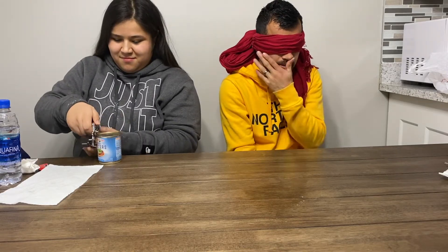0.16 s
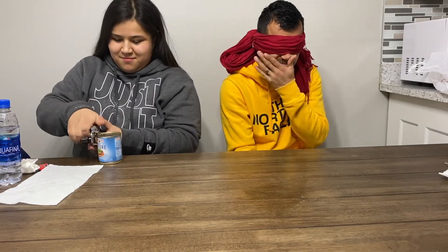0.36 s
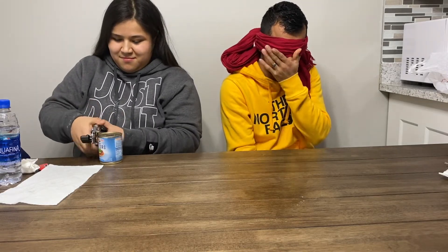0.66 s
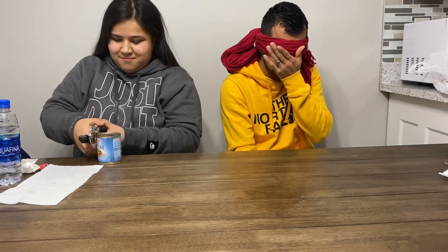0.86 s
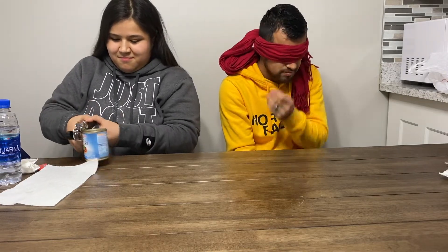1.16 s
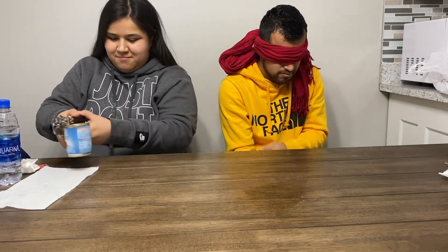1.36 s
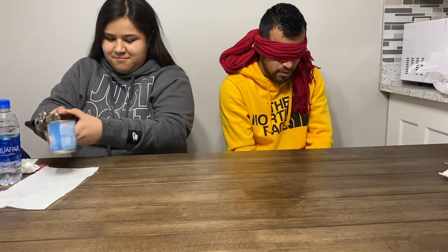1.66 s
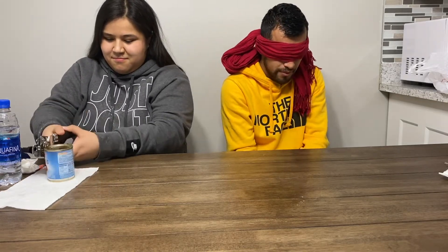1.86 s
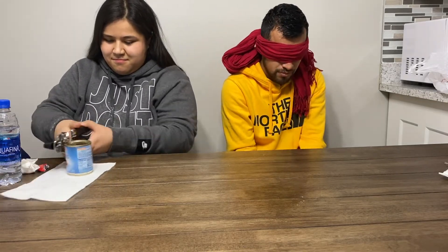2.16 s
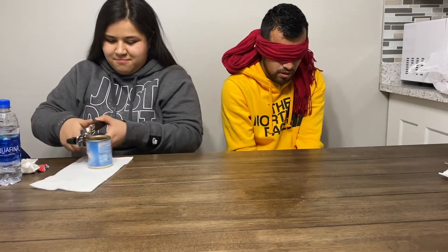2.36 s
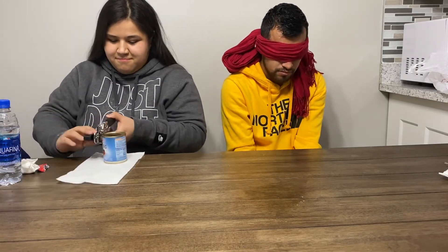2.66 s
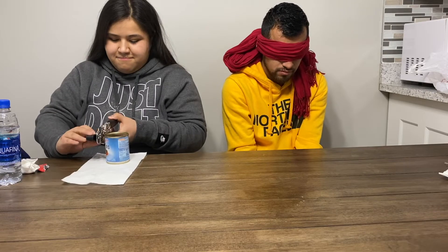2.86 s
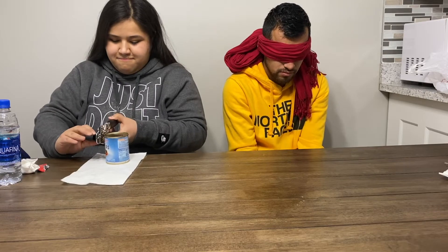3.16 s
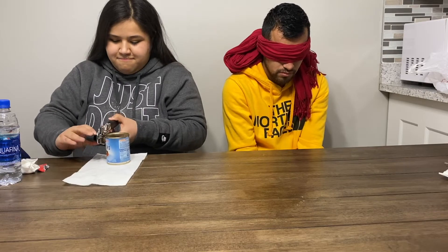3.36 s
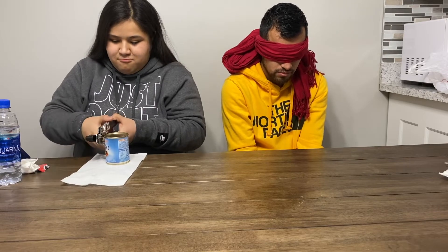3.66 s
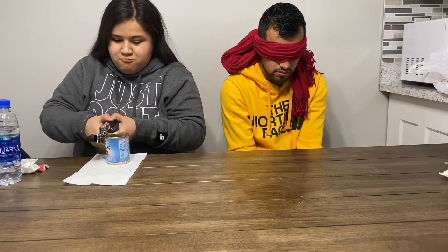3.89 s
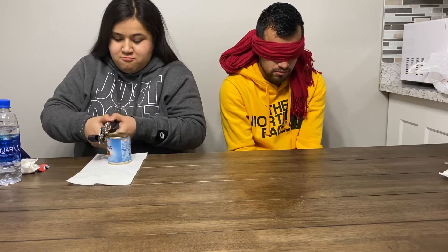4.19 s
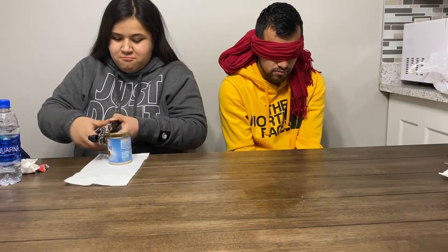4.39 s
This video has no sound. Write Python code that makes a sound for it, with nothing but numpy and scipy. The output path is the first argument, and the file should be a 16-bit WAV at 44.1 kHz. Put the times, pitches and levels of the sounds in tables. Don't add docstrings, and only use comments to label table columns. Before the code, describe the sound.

In a small kitchen with a humming fridge, a tin thuds on a wooden table, napkin rustles, opener ticks, then one sharp metallic snap rings.

```python
import sys
import numpy as np
from scipy import signal
from scipy.fft import rfft, irfft, next_fast_len
from scipy.io import wavfile

SR = 44100
rng = np.random.default_rng(int(sys.argv[2]) if len(sys.argv) > 2 else 0)


def generate_wav(sig):
    pcm = np.round(np.clip(np.atleast_2d(sig).T, -1, 1) * 32767).astype(np.int16)
    wavfile.write(sys.argv[1], SR, pcm)


def field_ratio(decibels):
    return 10 ** (np.asarray(decibels, dtype=float) / 20)


N = 199847


def rms_one(x):
    return x / np.sqrt(np.mean(x ** 2) + 1e-20)


def at_hz(points, hz):
    table_hz, value = np.transpose(points)
    return np.interp(np.log(np.maximum(hz, 1)), np.log(table_hz), value)


def coloured(x, spectrum):
    size = next_fast_len(x.shape[-1])
    gain = field_ratio(at_hz(spectrum, np.fft.rfftfreq(size, 1 / SR)))
    return rms_one(irfft(rfft(x, size) * gain, size)[..., :x.shape[-1]])


# (frequency [Hz], left-right likeness [0 to 1])
LIKENESS = [(60, 0.87), (130, 0.98), (290, 0.5), (640, 0.024), (1500, 0.013), (3000, 0.062), (6000, 0.12)]


def wide_noise(size):
    padded = next_fast_len(size)
    mid, side = rfft(rng.standard_normal((2, padded)))
    alike = np.clip(at_hz(LIKENESS, np.fft.rfftfreq(padded, 1 / SR)), 0, 1)
    stereo = np.sqrt(1 + alike) * mid + np.sqrt(1 - alike) * side * [[1], [-1]]
    return irfft(stereo, padded)[:, :size]


def drift(rate_hz):
    r = np.exp(-2 * np.pi * rate_hz / SR)
    return rms_one(signal.lfilter([1], [1, -2 * r, r * r], rng.standard_normal(N + SR))[SR:])


def resonate(x, hz, r):
    return signal.lfilter([1, 0, -1], [1, -2 * r * np.cos(2 * np.pi * hz / SR), r * r], x)


def ring(hz, t60, size=SR // 2):
    t = np.arange(size) / SR
    return np.sin(2 * np.pi * hz * t) * field_ratio(-60 * t / t60)


def ring_modes(modes):
    signs = rng.choice([-1, 1], len(modes))
    return sum(sign * field_ratio(db) * ring(hz, t60) for (hz, db, t60), sign in zip(modes, signs))


def add(out, s, sound):
    i = int(round(s * SR))
    out[i:i + len(sound)] += sound[:N - i]


# (frequency [Hz], width [Hz], level [dB])
HUM = [(115.5, 4, -55.5), (248, 1.8, -69.5), (357.5, 1.1, -64)]
# (frequency [Hz], level [dB per Hz])
AIR = [(15, -56), (30, -7.5), (60, -3.5), (120, -4.5), (195, -13.5), (354, -13.5), (476, -18.5),
       (1020, -27.5), (1600, -38), (2400, -40), (3100, -44), (3400, -51), (9570, -57.5), (16000, -78)]
AIR_DB = -54


def fridge():
    out = field_ratio(AIR_DB - 3) * coloured(wide_noise(N), AIR) * field_ratio(drift(0.33))
    for hz, width_hz, db in HUM:
        r = np.exp(-np.pi * width_hz / SR)
        waver = rms_one(resonate(rng.standard_normal(N + SR), hz, r)[SR:])
        steady = np.sin(2 * np.pi * hz / SR * np.arange(N) + 6 * rng.random())
        out = out + field_ratio(db) * (0.18 * waver + steady)
    return out


# (time [s], crack level [dB], thud level [dB], table ring level [dB], contact cut-off [Hz])
KNOCKS = [(.002, -47.5, -32.5, -37.5, 2210), (.043, -40, -28.5, -38.5, 3900),
          (0.048, -55, -43.5, -36, 3440), (0.316, -62, -38, -45.5, 2580), (0.452, -75, -35.5, -42, 2240),
          (0.461, -86, -38.5, -39, 1140), (1.875, -55, -18, -21.5, 1900), (1.879, -64, -13.5, -15.5, 1200),
          (1.888, -80, -35, -27.5, 850), (1.909, -53, -56.5, -24.5, 690),
          (3.531, -39.5, -44.5, -48.5, 1213), (3.544, -62, -38, -44, 600), (4.0891, -8.5, -12, -27, 4020),
          (4.096, -36, -30, -23, 1210)]
# (frequency [Hz], level [dB], t60 [s])
TABLE = [(55.9, -10.5, 0.87), (76.6, -18, 0.48), (102.1, -6.5, 0.23), (129, 1.5, 0.14), (178.5, 1, 0.19),
         (303.7, 2, 0.15), (383, -4, 0.034), (508, 1.5, 0.022), (668, -5, 0.091), (874.2, 1, 0.11),
         (1038, -6.5, 0.17)]
# (frequency [Hz], level [dB per Hz])
THUD = [(60, -38), (150, 8), (265, -4), (380, 1), (900, -3.5), (2000, -13), (4000, -21), (8000, -14)]
# (frequency [Hz], level [dB per Hz])
CRACK = [(500, -25.5), (1700, -22.5), (4000, -30), (7000, -2.5), (10000, -10), (14500, -2.5), (16500, -6.5)]
HARD_BASS_CUT = 0.05


def knocks():
    body, low, t = np.zeros(N), np.zeros(N), np.arange(SR // 10) / SR
    fade = field_ratio(-60 * t / 0.022)
    for s, crack_db, thud_db, ring_db, cut_hz in KNOCKS:
        soft = signal.butter(4, cut_hz, fs=SR, output="sos")
        brief = signal.butter(2, HARD_BASS_CUT * cut_hz, "high", fs=SR, output="sos")
        rings = ring_modes(TABLE)
        thud = coloured(rng.standard_normal(len(t)), THUD) * fade * (1 - np.exp(-t / 0.0004))
        thud = signal.sosfilt(soft, signal.sosfilt(brief, thud))
        crack = coloured(rng.standard_normal(len(t)), CRACK) * fade
        add(body, s, field_ratio(thud_db) * thud + field_ratio(crack_db - 5) * crack)
        add(low, s, field_ratio(ring_db - 11.5) * signal.sosfilt(soft, rings))
    return body, low


# (frequency [Hz], t60 [s])
ROOM_T60 = [(60, 0.37), (150, 0.35), (500, 0.46), (1500, 0.45), (4000, 0.45), (8000, 0.38), (14000, 0.26)]
EDGES = 40 * 2 ** np.arange(0, 9.1, .5)


def kitchen():
    t, white, tail = np.arange(SR // 2) / SR, wide_noise(SR // 2), 0
    for low, high in zip(EDGES, EDGES[1:]):
        band = signal.sosfilt(signal.butter(2, [low, high], "band", fs=SR, output="sos"), white)
        tail = tail + band * field_ratio(-60 * t / at_hz(ROOM_T60, np.sqrt(low * high)))
    return tail * (1 - np.exp(-t / 0.0018)) / np.sqrt(np.sum(tail ** 2) / 2)


# (frequency [Hz], level [dB per Hz])
CLATTER = [(500, -6), (1600, -3.5), (2800, 1.5), (4200, -7), (6500, -17.5), (10000, -6), (14500, -19),
           (16500, -10)]


def knock_echoes():
    s, crack_db, thud_db, ring_db, cut_hz = np.transpose(KNOCKS)
    white, out = wide_noise(N), 0
    for low, high in zip(EDGES, EDGES[1:]):
        hz, fed = np.sqrt(low * high), np.zeros(N)
        thud = field_ratio(2 * (thud_db + at_hz(THUD, hz) + 0.5))
        thud = thud / (1 + (hz / cut_hz) ** 8)
        thud = thud / (1 + (HARD_BASS_CUT * cut_hz / hz) ** 4)
        fed[(s * SR).astype(int)] = thud + field_ratio(2 * (crack_db + at_hz(CLATTER, hz) - 12))
        fall = field_ratio(-120 / (SR * at_hz(ROOM_T60, hz)))
        rise = np.exp(-1 / (SR * (0.00022 + 0.5 / hz)))
        energy = signal.lfilter([1 - rise], np.convolve([1, -fall], [1, -rise]), fed + 1e-18)
        band = signal.butter(4, [low, high], "band", fs=SR, output="sos")
        out = out + np.sqrt(energy) * signal.sosfilt(band, white)
    return out


# (time [s], peak level [dB], pitch [Hz], ring t60 [s])
TICKS = [(0.575, -49.5, 3200, 0.0068), (.629, -52, 3060, 0.0037), (0.874, -54, 12400, 0.0022),
         (1.625, -48.5, 1310, 0.028), (1.645, -64, 3260, 0.005), (1.682, -53.5, 13500, 0.0014),
         (1.754, -51.5, 9960, 0.0012), (1.764, -53, 3400, 0.0084), (2.335, -45.5, 3000, 0.0048),
         (2.345, -60, 5100, 0.0065), (2.68, -56.5, 1080, 0.018), (2.700, -50, 3000, 0.008),
         (2.722, -57, 2900, 0.01), (2.781, -58, 9000, 0.0015), (3.089, -62, 690, 0.022),
         (3.338, -53, 6700, 0.0017), (3.411, -62.5, 6900, 0.0059), (1.7543, -55, 15000, 0.0024),
         (1.766, -56, 7900, 0.0073), (3.531, -48, 9720, 0.019), (3.53, -49.5, 2760, 0.095),
         (3.538, -45, 2450, .03), (3.535, -52, 1283, 0.1), (0.045, -43, 1930, 0.078),
         (0.051, -43, 1104, 0.12), (0.044, -41, 6300, 0.003), (3.58, -56, 8250, 0.002),
         (4.387, -56, 6000, 0.0022), (4.461, -60.5, 6340, 0.0092), (1.878, -48, 3500, .006)]


def ticks():
    out, t = np.zeros(N), np.arange(SR // 5) / SR
    for s, db, hz, t60 in TICKS:
        puff = rng.standard_normal(len(t)) * field_ratio(-60 * t / 0.0042)
        ping = resonate(puff, hz, field_ratio(-60 / (t60 * SR)))
        click = field_ratio(-22) * min(hz / 4000, 1) * np.diff(puff, prepend=0)
        add(out, s, field_ratio(db) * (ping / np.max(np.abs(ping)) + click))
    return out


# (time [s], level [dB])
SNAP = [
    (0.046, -48),
    (4.0889, -20),
    (4.096, -29.5),
]
TIN_HZ = [1514, 1558, 1662, 1681, 1808, 2310, 2640, 2687, 2897, 2970, 3290, 3840, 4192, 9600]
# (level [dB], t60 [s])
TIN = [(-3, .14), (-4, .3), (-1, .14), (-2, .17), (-10, .12), (-22, 0.16), (-18, 0.14), (-8.5, 0.12),
       (-13, 0.16), (-15, 0.17), (-23, .1), (-17.5, .12), (-16.5, 0.15), (-28, .05)]


def tin():
    out = np.zeros(N)
    modes = [(hz, db, t60) for hz, (db, t60) in zip(TIN_HZ, TIN)]
    for s, level_db in SNAP:
        add(out, s, field_ratio(level_db) * ring_modes(modes))
    return out


SPEED_UP, SLOW_DOWN = 0.36, 0.65
DIE_S = 0.01


def strokes(rows):
    t, power = np.arange(N) / SR, np.zeros((2, N))
    up, down = SPEED_UP, SLOW_DOWN
    top_speed = up ** up * down ** down / (up + down) ** (up + down)
    for s, length, db, along_db in rows:
        way = np.clip((t - s) / length, 0, 1)
        speed = way ** up * (1 - way) ** down / top_speed
        power += (speed * field_ratio([[db], [db + along_db]])) ** 2
    r = np.exp(-1 / (SR * DIE_S))
    return signal.lfilter([1 - r], [1, -r], power + 1e-18)


# (start [s], length [s], level [dB], weight on the wood [dB])
SHIFTS = [(.1, 0.28, -70, 21), (.42, 0.17, -69, 20.5), (.56, 0.13, -60, 11), (.68, 0.19, -83, 25.5),
          (.85, 0.23, -72.5, 17), (1.2, 0.47, -69, 14), (1.6, .09, -87, 14), (1.855, 0.15, -58, 0.5),
          (1.98, 0.29, -90, 36.5), (2.36, 0.32, -73, 9.5), (2.68, 0.057, -73, 12), (2.95, .33, -80, 2),
          (3.3, 0.21, -73.5, 0), (4.066, 0.035, -56.5, -12), (4.28, .3, -65, 9)]
# (start [s], length [s], level [dB], dull rub under it [dB])
SLIDES = [(.12, 0.81, -90.5, 3), (.25, 0.18, -88, 21), (.868, 0.12, -93, 6), (1.172, 0.23, -69.5, -11),
          (1.215, 0.34, -60, -10.5), (1.31, .24, -60, -13), (1.675, .08, -87.5, 7), (1.755, 0.053, -84, 4),
          (1.94, 0.73, -71.5, -5.5), (2.33, 0.056, -71.5, 6), (2.69, 0.16, -76.5, 7), (3.315, 0.12, -75, 5),
          (3.53, 0.12, -65.5, 5), (4.385, 0.19, -74.5, -6)]
# (frequency [Hz], level [dB per Hz])
HISS = [(1500, -37), (3000, -4.5), (5000, -8.5), (6500, -8), (8500, -4.5), (10300, -7), (12000, -10),
        (14200, -1), (15500, 2), (16400, -19.5)]
# (frequency [Hz], level [dB per Hz])
SCUFF = [(500, -17), (1200, 3.5), (2200, 0), (3300, -2.5), (5000, -17), (6500, -19), (8000, -20.5),
         (10000, -40)]
# (frequency [Hz], level [dB per Hz])
RUMBLE = [(40, -20.5), (90, -5), (300, 2.5), (700, -7.5), (1500, -11.5), (3000, -62)]
RESTLESS_SCUFF_DB, RESTLESS_RUMBLE_DB = -106, -76.5
PRESS_HZ, PRESS_POWER, FIRM_DB = 11400, 0.32, -61.5


def rubbing():
    paper, under = strokes(SLIDES)
    cloth, weight = strokes(SHIFTS)
    grains = rng.standard_normal((2, N)) * field_ratio(0.31 * rng.exponential(1, (2, N)))
    fibres = coloured(grains[0], HISS)
    lower = signal.sosfilt(signal.butter(4, PRESS_HZ, fs=SR, output="sos"), fibres)
    pressed = fibres + lower * ((paper / field_ratio(2 * FIRM_DB)) ** PRESS_POWER - 1)
    hiss = pressed * np.sqrt(paper) * field_ratio(3 + drift(20))
    scuff = coloured(grains[1] + 3.3 * wide_noise(N), SCUFF) * field_ratio(1.86 * drift(8.6))
    scuff = scuff * np.sqrt(under + cloth + field_ratio(2 * RESTLESS_SCUFF_DB))
    rumble = coloured(wide_noise(N), RUMBLE) * field_ratio(-3.5 + 1.36 * drift(13))
    rumble = rumble * np.sqrt(weight + field_ratio(2 * RESTLESS_RUMBLE_DB))
    return hiss + scuff + rumble


def scene():
    hum = fridge()
    (body, low), small, metal = knocks(), ticks(), tin()
    sent = field_ratio(6.5) * low + field_ratio(1) * metal + field_ratio(0.5) * small
    room = signal.fftconvolve(sent[None], kitchen(), axes=1)[:, :N] + knock_echoes()
    return body + low + metal + small + room + rubbing() + hum


def roll_off(x):
    return signal.sosfilt(signal.butter(12, 16830, fs=SR, output="sos"), x)


# (frequency [Hz], left minus right [dB])
LEFT_LEAN = [(300, 0), (1500, 1), (2500, 3), (5500, 7.5), (6500, -1.5)]
MIC_LOW_HZ, MIC_TOP_HZ = 41.3, 16000
SPLIT_HZ = 6300
IN_STEP_HZ, TURN_HZ = 10200, 3660
PAD = next_fast_len(N)


def record(dry):
    left, right = rfft(dry, PAD)
    hz = np.fft.rfftfreq(PAD, 1 / SR)
    lean = field_ratio(at_hz(LEFT_LEAN, hz) / 2)
    band = 1 / np.sqrt(1 + (MIC_LOW_HZ / (hz + 1)) ** 6) / (1 + (hz / MIC_TOP_HZ) ** 60)
    left, right = left * lean * band, right / lean * band
    treble = np.clip((hz - SPLIT_HZ) / 600 + .5, 0, 1)
    early = np.exp(2j * np.pi * (hz - IN_STEP_HZ) / TURN_HZ)
    right = (1 - treble) * right + treble * left * early
    mix = irfft(np.array([left, right]), PAD)[:, :N]
    return roll_off(mix)


dry = scene()
out = record(dry)
generate_wav(out)
```